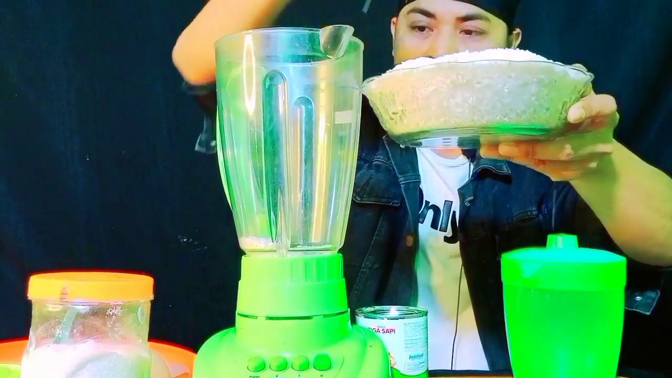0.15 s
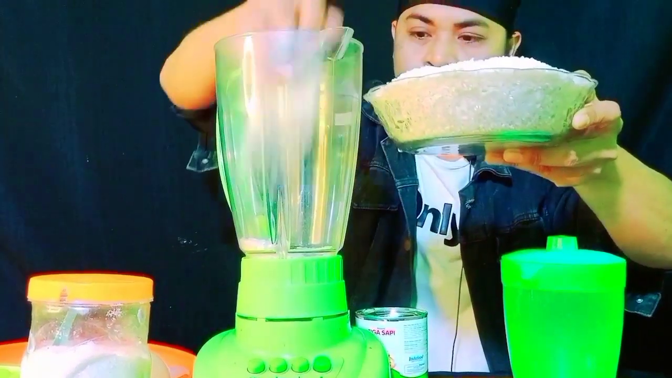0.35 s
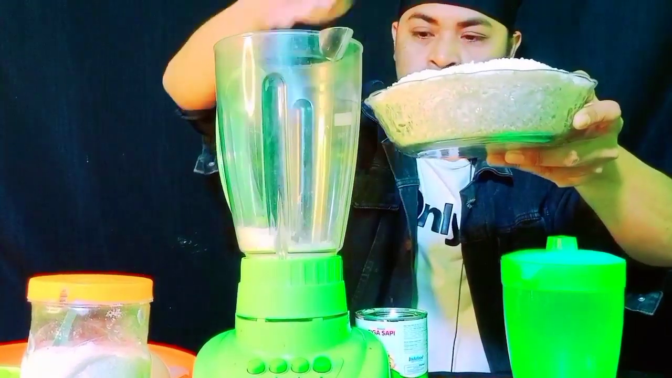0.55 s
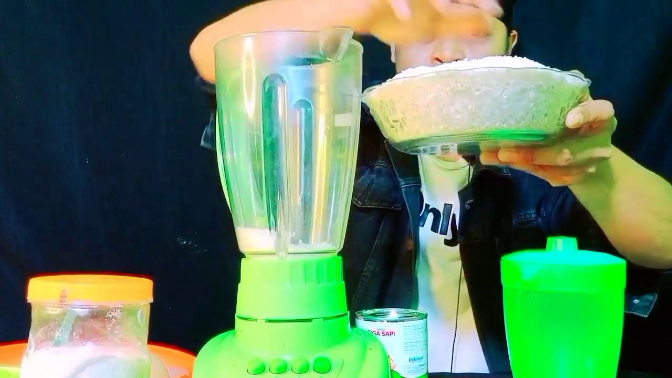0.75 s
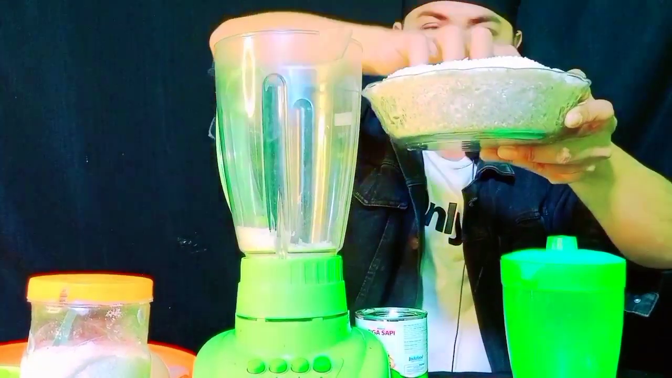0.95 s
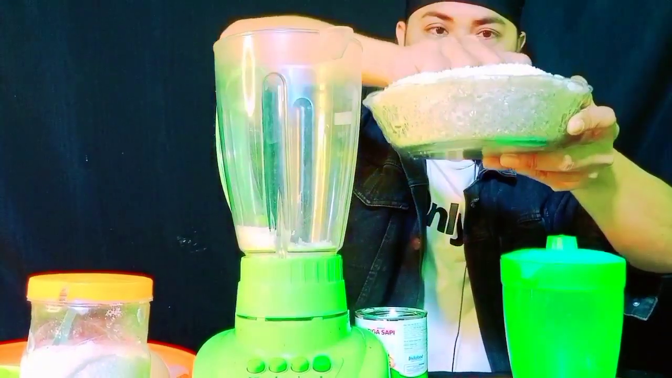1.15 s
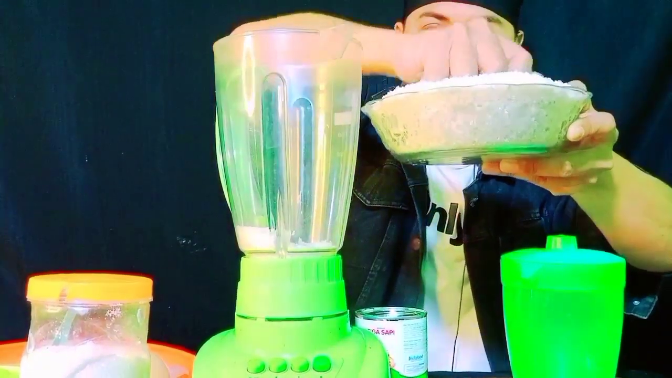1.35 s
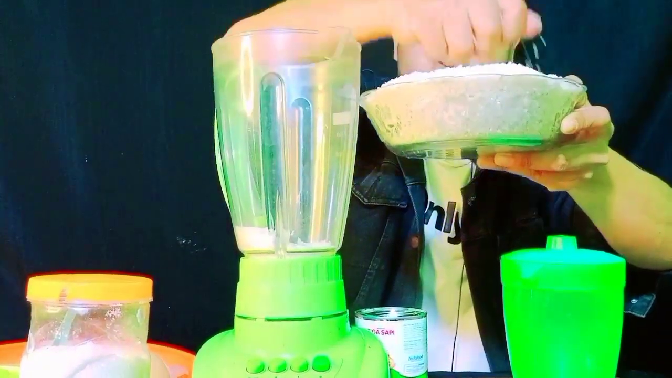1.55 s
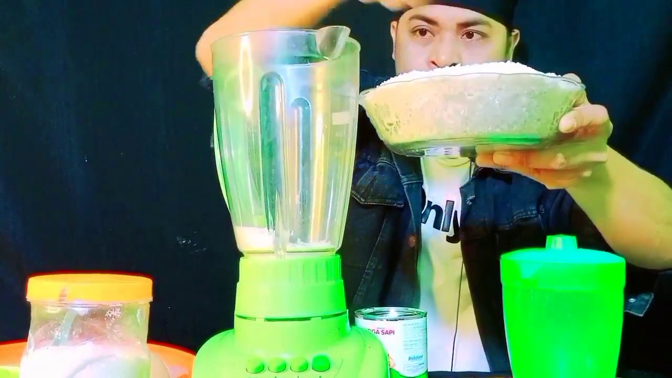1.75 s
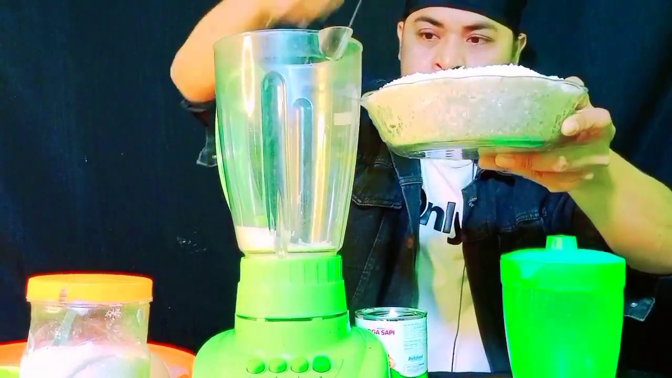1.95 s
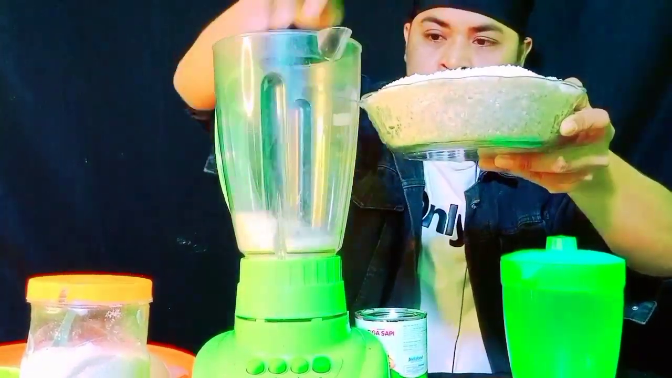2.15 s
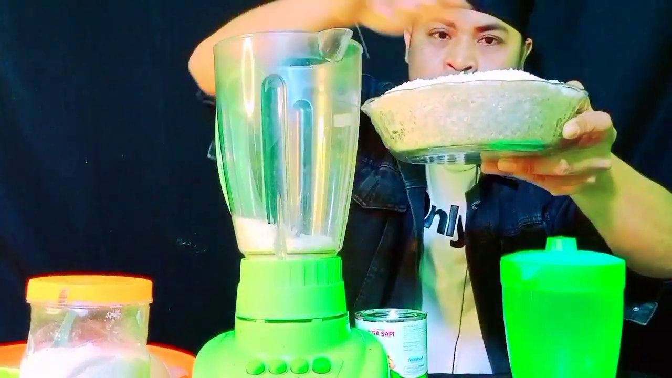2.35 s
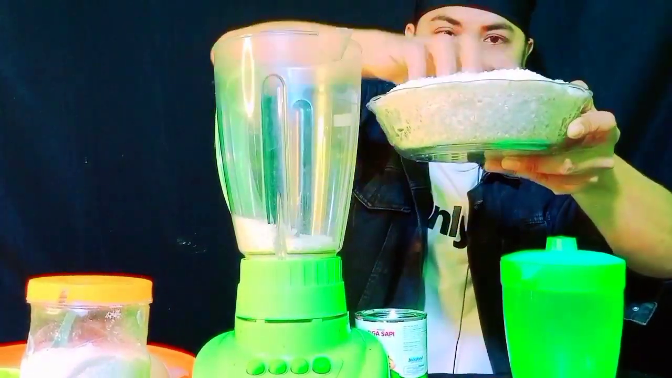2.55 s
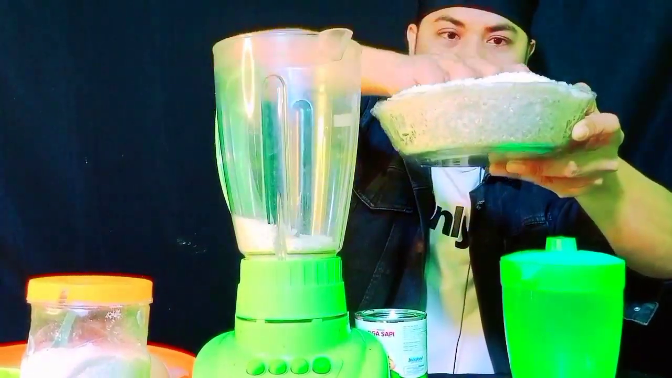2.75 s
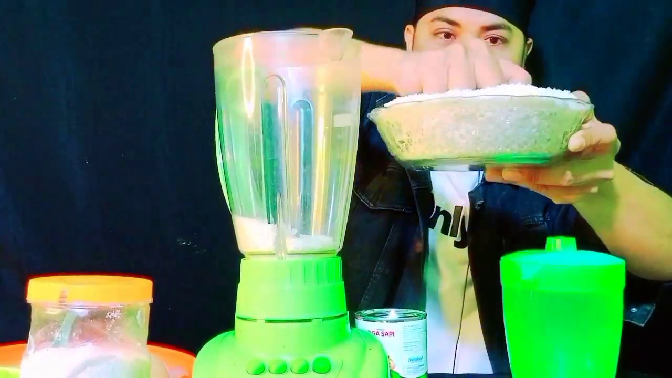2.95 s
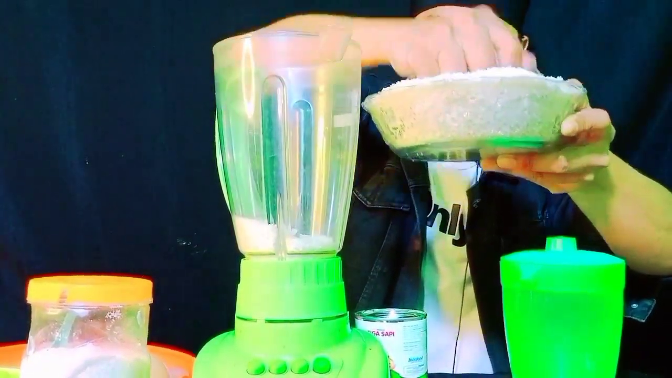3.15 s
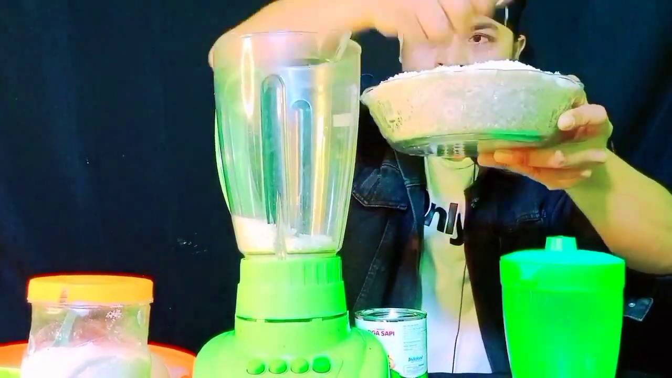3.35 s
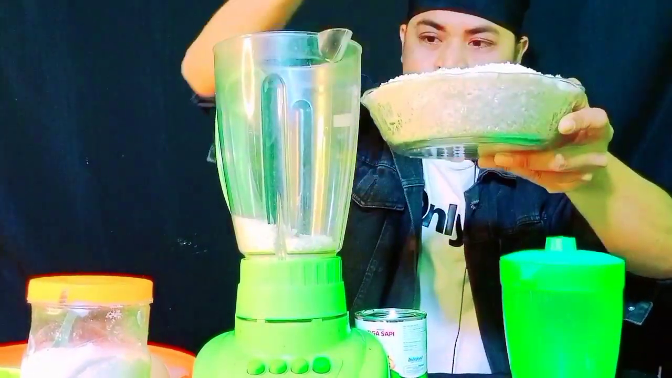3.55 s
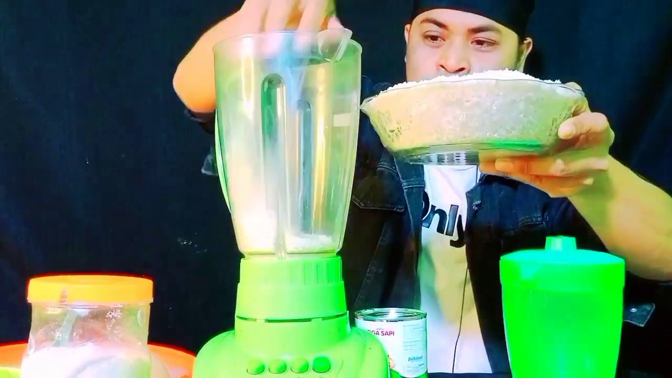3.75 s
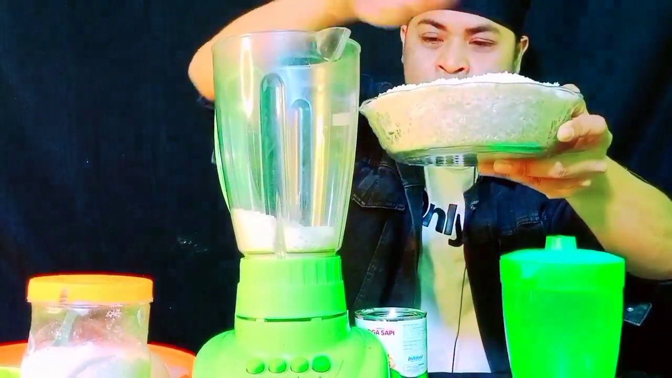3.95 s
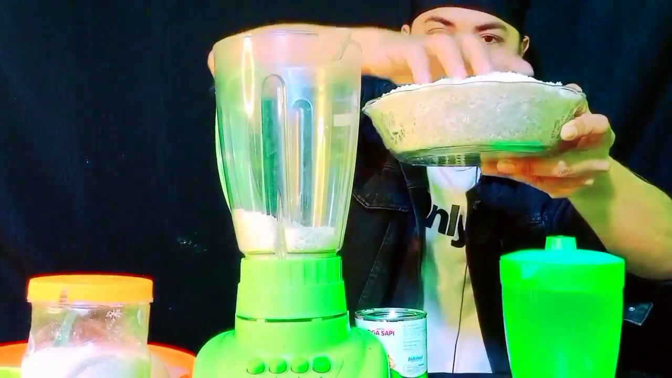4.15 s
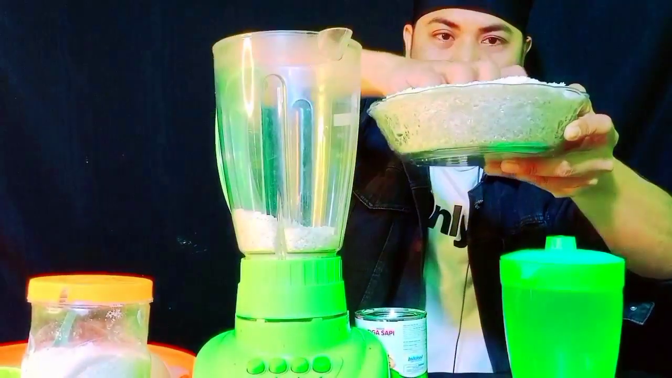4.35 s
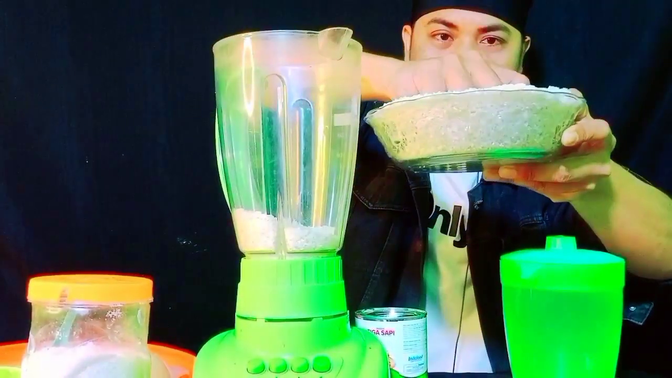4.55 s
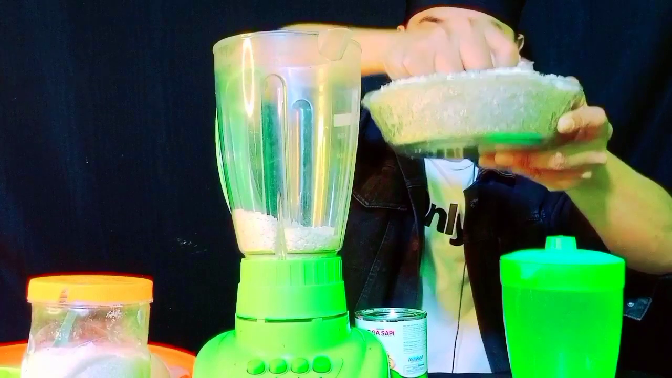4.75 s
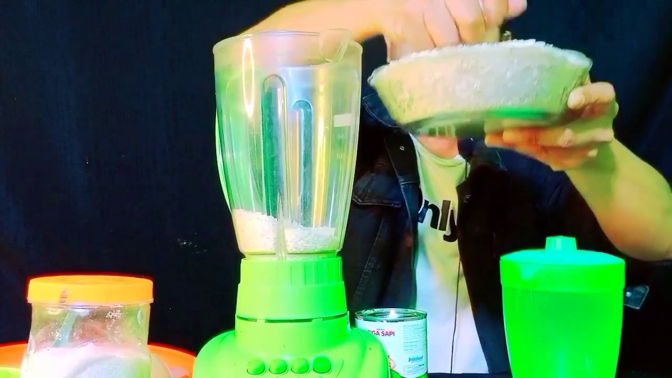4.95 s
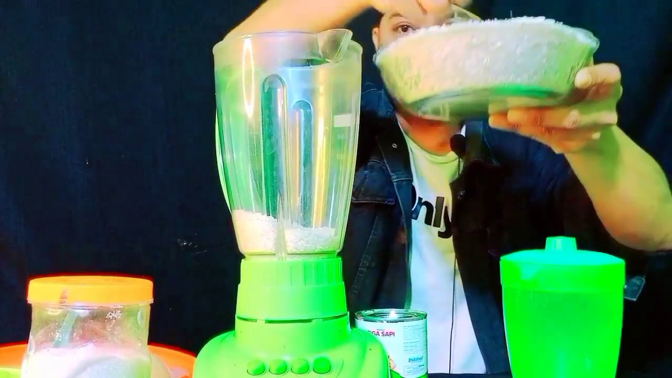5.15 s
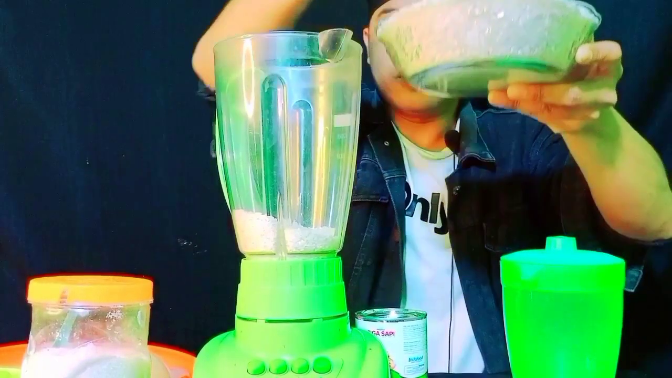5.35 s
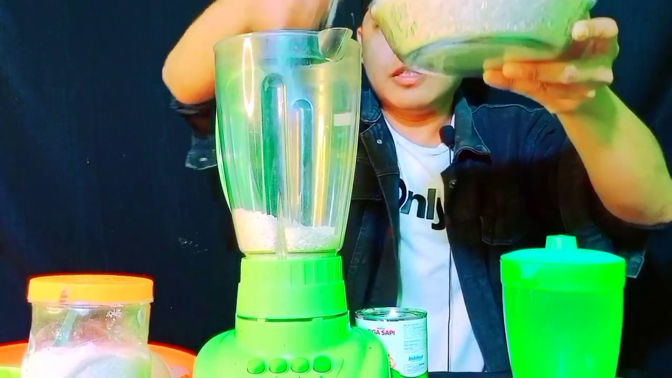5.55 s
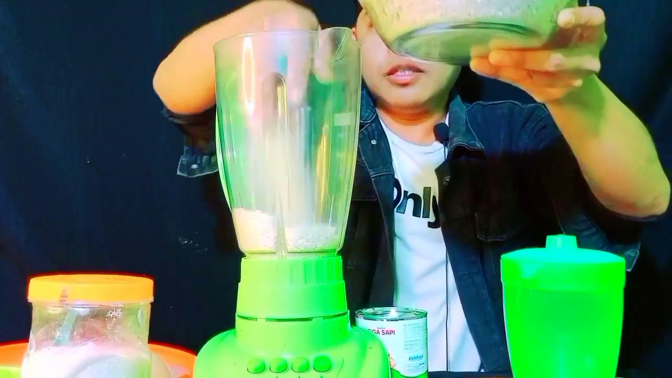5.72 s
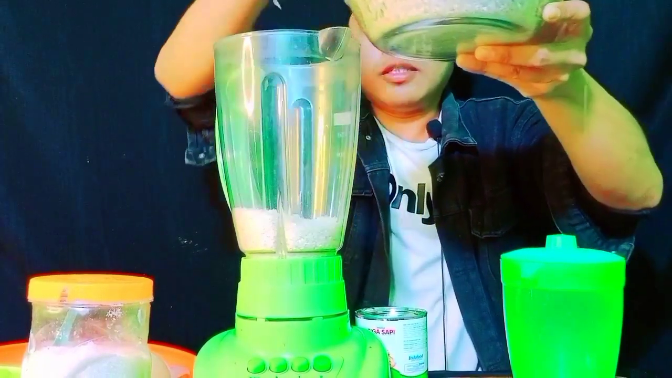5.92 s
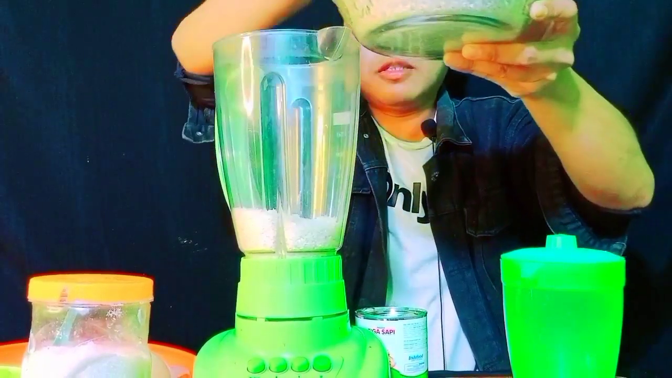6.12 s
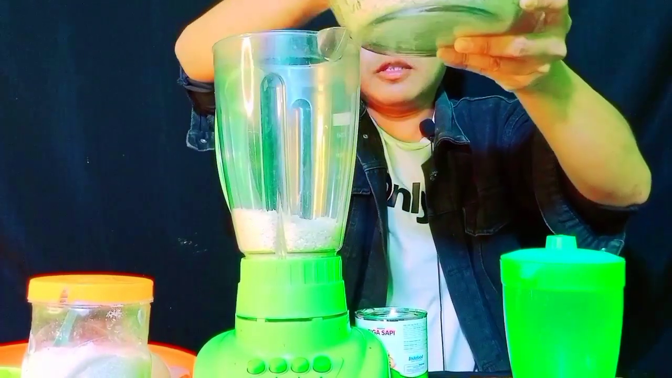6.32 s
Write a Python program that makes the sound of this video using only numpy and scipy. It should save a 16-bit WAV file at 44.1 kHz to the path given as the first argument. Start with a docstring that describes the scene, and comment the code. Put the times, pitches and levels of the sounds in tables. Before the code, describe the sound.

Raw rice rattles into a plastic blender jar right at the start, with a hollow knock, and another handful follows at about 0.3 seconds as a short, bright hiss of tiny impacts. Stray grains tick on the wall. Around 1 second a hand crunches faintly in a bowl of rice, and at 1.5 the jar is bumped, clacking and ringing hollowly. A louder handful lands at 2 seconds, followed by a knock. Soft scooping returns from 2.5 to 3, then a light bump. Another handful falls at 3.7, with the strongest clack at 3.8. Faint scooping runs from 4.2 to 4.8. A softer handful lands at 5.7, trailing into a thin trickle, with two knocks at 6 and 6.2 and a few dry clicks. Everything is close to the microphone, in a room with a short echo and a faint low rumble.

```python
"""Indoors at a table, microphone close to a plastic blender jar, in a room that rings for half a second.
A hand crunches into a bowl of raw rice and drops it into the jar, one handful after another.
Each handful is a shower of tiny impacts, and stray grains tick on the wall. Now and then the arm
bumps the jar, which clacks on its base and rings hollowly. Steady room tone lies underneath."""
import sys
import numpy as np
from scipy import signal
from scipy.fft import rfft, irfft, next_fast_len
from scipy.io import wavfile
from scipy.ndimage import map_coordinates

SR = 44100
rng = np.random.default_rng(int(sys.argv[2]) if len(sys.argv) > 2 else 0)


def pcm_store(signal):
    """Save signal as 16-bit PCM."""
    levels = np.round(np.clip(np.atleast_2d(signal), -1, 1) * 32767)
    wavfile.write(sys.argv[1], SR, levels.astype(np.int16).T)


N = 285889

# The room's reverberation. Each row: frequency in Hz, t60 in seconds.
ROOM_DECAY = [(150, 0.99), (600, 0.39), (2000, 0.49), (5000, 0.47), (9000, 0.42), (15000, 0.26)]
# Tone colours. Each row: frequency in Hz, relative spectral density in dB.
ROOM_TONE_SPECTRUM = [(15, -63.5), (28, -34), (48, -19.5), (62, -7.5), (85, -3.5), (112, -11), (165, -6),
                      (260, -13), (420, -16), (1900, -24), (3200, -28), (6200, -49), (8900, -42.5),
                      (11500, -50), (15400, -42)]  # the steady background
CRUNCH_SPECTRUM = [(300, -24), (620, -8), (900, 4), (1200, -2.5), (1500, -5), (1950, -4.5), (2500, -7),
                   (3300, -16), (4500, -26.5), (6500, -38), (8900, -19), (11000, -39), (15400, -18)]  # grains rubbing in the bowl
SQUEEZE_SPECTRUM = [(400, -25), (750, -23), (950, 1.5), (1400, -12.5), (1950, 7.5), (2400, -6), (3200, -8),
                    (4500, -27), (15000, -37)]  # the fist closing on the grains
CLICK_SPECTRUM = [(600, -34), (1300, -2.5), (1800, 4.5), (2150, -4), (2600, 6), (3100, -10), (3750, 0),
                  (4700, -8.5), (5600, -7.5), (6800, -13), (8000, -3), (9200, -1), (10700, -13.5),
                  (15400, -7.5)]  # a light, dry click
CLACK_SPECTRUM = [(60, -32.5), (170, -20.5), (300, -8), (450, 4), (650, -5.5), (900, -1.5), (1200, -6),
                  (1460, -4), (1750, -7.5), (2100, -4), (2600, -8), (3500, -14), (4400, -28.5), (6500, -37),
                  (15000, -42)]  # the jar striking its seat
THUD_SPECTRUM = [(25, -38.5), (60, -6.5), (110, -15), (175, -2), (240, -3), (350, -5), (600, -18.5),
                 (2000, -53.5)]  # the table under the blender
GRAIN_SPECTRUM = [(40, -48), (120, -18.5), (260, -17), (420, -15), (620, -16), (1000, -11.5), (1400, 0),
                  (2300, 0.5), (3200, -1.5), (4300, -10), (6300, -14.5), (7600, -11), (8900, 0.5),
                  (9900, -11.5), (12500, -12), (14200, -10), (15400, -2)]  # a grain landing in the jar
# Resonances. Each row: frequency in Hz, relative level in dB, free t60 in seconds.
JAR_MODES = [(342, -10, 0.16), (383, -3.5, 0.3), (420.5, -1, 0.47), (480, -15.5, 0.34), (519.5, 0, 0.51),
             (536.6, -5, 0.65), (576, -9.5, 0.14), (761.6, -11, 0.63), (975, -18.5, 0.29),
             (1170, -18.5, 0.79), (1442, -14.5, 0.33), (1980, -20.5, 0.21), (2350, -18.5, 0.19)]  # the whole jar, knocked
WALL_MODES = [(427, -5, 0.16), (559.6, -3, 0.17), (783.8, -0.5, 0.2), (1188, -5.5, 0.19), (1247, 7, .07),
              (1498, 11.5, 0.058), (2206, 1, 0.14), (2469, 5, 0.17), (3030, -4, 0.018), (3610, -5, 0.02)]  # its wall and air column under the light grains
# Lone contacts. Each row: start in seconds, relative level in dB.
STRAY_GRAINS = [(.055, -46), (.074, -31.5), (.163, -39.5), (.236, -43.5), (.269, -37.5), (.313, -33.5),
                (.697, -46), (.726, -54), (.783, -50), (1.975, -54), (5.43, -63.5), (5.474, -57),
                (5.553, -40.5), (5.615, -37.5), (5.871, -47)]  # single grains and small clusters on the wall
DRY_CLICKS = [(1.002, -56), (2.672, -58.5), (2.706, -58), (2.851, -60), (3.019, -62), (3.474, -44.5),
              (6.043, -41.5), (6.08, -40.5), (6.288, -48.5), (6.392, -57), (6.468, -33.5)]  # light clicks of grains and plastic
# The hand in the bowl. Each row: fingers in, fist shut and closing time in seconds, relative grip in dB.
BOWL_SCOOPS = [(0.838, 1.359, 0.078, -54), (2.549, 3.014, 0.045, -53.5), (4.17, 4.786, 0.031, -52)]
# The arm bumping the jar. Each row: start in seconds, then ring, clack, low-mode boost and thud
# in relative dB, then seconds until the jar drops back.
JAR_BUMPS = [(-.04, -30.5, -26, 5, -46, .04), (1.477, -28, -26.5, -4, -47, .03),
             (2.004, -32, -35.5, 1.5, -50.5, .03), (2.152, -23, -25.5, -3, -45.5, .045),
             (3.225, -32.5, -32, -0.5, -56.5, .057), (3.527, -41, -42, -2, -53.5, .047),
             (3.822, -17.5, -16.5, -3, -37, .03), (6.029, -23, -27.5, -20, -48, .059),
             (6.223, -26, -26.5, -1.5, -36, .04)]
# Rice slipping from the fingers. Each row: start and length in seconds, relative flow in dB.
FINGER_TRICKLES = [(0.07, 0.27, -54.5), (0.602, 0.33, -54), (5.555, 0.24, -40.5), (6.076, 0.37, -51.5)]
# Rice dropped into the jar. Each row: start, opening time and time at full flow in seconds,
# relative flow in dB, hardness (treble of hits on the bare wall) in dB.
DROPPED_HANDFULS = [(-.2, 0.097, 0.037, -24.5, 2.5), (.27, 0.14, .02, -23.5, 0),
                    (2.003, 0.099, 0.0097, -19, -3), (3.688, 0.049, 0.047, -21, -1.76),
                    (5.654, 0.069, .035, -27, -3.5)]


def amp(db):
    """Decibels to gain."""
    return 10 ** (np.asarray(db) / 20)


def unit(x):
    """Scale to rms 1."""
    return x / np.sqrt(np.mean(x ** 2) + 1e-20)


def along(points, hz):
    """Read (Hz, value) points on a log frequency axis."""
    freqs, values = np.transpose(points)
    return np.interp(np.log(hz + 1), np.log(freqs + 1), values)


def add(track, s, sound):
    """Mix a sound into the track at s seconds; it may begin before time 0."""
    start = round(s * SR)
    sound = sound[max(0, -start):]
    part = track[max(0, start):][:len(sound)]
    part += sound[:len(part)]


def coloured(x, spectrum, size=4096):
    """Pass x through a causal body of this spectrum, with energy 1."""
    gain = amp(along(spectrum, np.fft.rfftfreq(size, 1 / SR)))
    cepstrum = irfft(np.log(gain))
    cepstrum[1:size // 2] *= 2  # fold to minimum phase
    cepstrum[size // 2 + 1:] = 0
    response = irfft(np.exp(rfft(cepstrum)))
    return signal.fftconvolve(x, response / np.linalg.norm(response))[:N]


def wobble(size, rate):
    """A smooth random curve, rate knots a second."""
    knots = rng.standard_normal(int(size * rate / SR) + 4)
    return map_coordinates(knots, [np.arange(size) * rate / SR])


def impacts(rate, scatter_db):
    """Random impulses of uneven size, rate a second, with mean power 1."""
    chance = np.clip(rate / SR, 1e-6, 1)
    sizes = unit(amp(scatter_db * np.clip(rng.standard_normal(N), -2, 2)))
    signs = rng.choice([-1, 1], N)
    return (rng.random(N) < chance) * sizes * signs / np.sqrt(chance)


def burst(t, rise_s, t60):
    """Noise that swells and dies quickly: one chattering contact."""
    return rng.standard_normal(len(t)) * (1 - np.exp(-t / rise_s)) * amp(-60 * t / t60)


def room_tone(level_db=-63):
    """The background at the microphone: a steady low rumble with faint hiss."""
    return amp(level_db) * unit(coloured(rng.standard_normal(N), ROOM_TONE_SPECTRUM))


def reverberation(x, build_s=0.013, tail_count=22):
    """The room's diffuse tail, treble dying first; it varies slowly so it stays smooth."""
    wet, position = np.zeros(N), np.linspace(0, tail_count - 1, N)
    for k in range(tail_count):
        hz, t, noise = signal.stft(rng.standard_normal(SR * 3 // 4), SR, nperseg=256)
        build = np.clip(t / build_s, 0, 1) ** 2
        decay = amp(-60 * t / along(ROOM_DECAY, hz)[:, None])
        tail = signal.istft(noise * build * decay, SR, nperseg=256)[1]
        near = np.flatnonzero(abs(position - k) < 1)
        crossfade = np.cos(np.pi / 2 * (position[near] - k))
        add(wet, near[0] / SR, signal.fftconvolve(x[near] * crossfade, tail / np.linalg.norm(tail)))
    return wet


def scooping(dig_db=-64, entry_s=0.057, lift_s=0.06, release_s=0.021):
    """Grains rub under the fingers: a muffled crunch with stray ticks, a scrape as the fist closes."""
    t = np.arange(N) / SR
    dig, grip = np.zeros(N), np.zeros(N)
    for enter_s, shut_s, closing_s, grip_db in BOWL_SCOOPS:
        before, after = np.maximum(shut_s - t, 0), np.maximum(t - shut_s, 0)
        dig += amp(dig_db) * np.clip((t - enter_s) / entry_s, 0, 1) * np.exp(-after / lift_s)
        grip += amp(grip_db) * np.exp(-(before / closing_s) ** 2 - after / release_s)
    crunch = np.maximum(dig, grip) * coloured(impacts(rate=2000, scatter_db=1.5), CRUNCH_SPECTRUM)
    scrape = grip * coloured(impacts(rate=1900, scatter_db=4.5), SQUEEZE_SPECTRUM)
    ticking = dig * coloured(impacts(rate=25, scatter_db=2), CLICK_SPECTRUM)
    return amp(-3) * (crunch + scrape) + amp(-16) * ticking


def ticks(rows, spectrum, t60):
    """Lone contacts of grain or plastic, each with a brief chatter."""
    track, t = np.zeros(N), np.arange(SR // 20) / SR
    for s, db in rows:
        add(track, s, amp(db + 7.5) * burst(t, rise_s=0.00069, t60=t60))
    return coloured(track, spectrum)


def housing_hum(bump_s=2.152, db=-15, hz=265, rise_s=0.12, t60=0.54):
    """The heavy motor housing takes up one bump slowly and hums."""
    t = np.maximum(np.arange(N) / SR - bump_s, 0)
    swell = (1 - np.exp(-t / rise_s)) ** 2
    return swell * amp(db - 60 * t / t60) * np.sin(2 * np.pi * hz * t)


def jar_ring(t, low_db, arm_damping=1.193, scatter_db=1.73, waver_cycles=0.2, waver_rise_s=0.043):
    """The knocked jar rings, damped by the arm; the ring soon wavers and roughens."""
    ring = np.zeros(len(t))
    waver = waver_cycles * (1 - np.exp(-t / waver_rise_s))
    for k, (hz, db, t60) in enumerate(JAR_MODES):
        level = db + scatter_db * rng.standard_normal() + low_db * (hz < 450)
        cycles = hz * t + waver * wobble(len(t), rate=45)
        # neighbouring modes start in opposite directions, so the ring swells and beats
        ring += (-1) ** k * amp(level - 60 * arm_damping * t / t60) * np.sin(2 * np.pi * cycles)
    return ring * (1 - np.exp(-t / 0.00074))


def jar_knocks(contact_s=0.0053, soft_hz=2700, rattle_delay_s=0.02, rattle_db=-7):
    """The jar clacks on its seat, rattles and rings, then drops back more softly; the table thuds."""
    clacks, thuds, ringing = np.zeros(N), np.zeros(N), np.zeros(N)
    t = np.arange(SR * 2 // 3) / SR
    contact = (t / contact_s) ** 2 * np.exp(1 - (t / contact_s) ** 2)
    soft = signal.butter(3, soft_hz, fs=SR, output="sos")  # first contact is duller than the rattle
    for s, ring_db, clack_db, low_db, thud_db, drop_s in JAR_BUMPS:
        bump = (s, ring_db, clack_db)
        drop_back = (s + drop_s, ring_db - 14.5, clack_db - 6.5)
        for at, ring, clack in (bump, drop_back):
            add(clacks, at, amp(clack) * contact * signal.sosfilt(soft, rng.standard_normal(len(t))))
            add(clacks, at + rattle_delay_s, amp(clack + rattle_db) * burst(t, rise_s=0.012, t60=0.15))
            add(ringing, at, amp(ring) * jar_ring(t, low_db))
        add(thuds, s, amp(thud_db) * burst(t, rise_s=0.0074, t60=0.21))
    blows = coloured(clacks, CLACK_SPECTRUM) + coloured(thuds, THUD_SPECTRUM)
    return blows, ringing


def rice_flow(emptying_db_per_s=161.5, cushion_db_per_s=29, trickle_fade_db=10.5, trickle_hard_db=-1):
    """Flow and hardness of the falling rice: handfuls swell, hold and die away; trickles fade."""
    t = np.arange(N) / SR
    flow, treble = np.zeros(N), np.zeros(N)
    for s, opening_s, hold_s, db, hard_db in DROPPED_HANDFULS:
        opening = np.sin(np.pi / 2 * np.clip((t - s) / opening_s, 0, 1)) ** 2
        late = np.maximum(t - s - opening_s - hold_s, 0)
        stream = opening * amp(db - emptying_db_per_s * late)
        flow += stream
        treble += stream * amp(hard_db - cushion_db_per_s * late)  # late grains land on earlier ones
    for s, length_s, db in FINGER_TRICKLES:
        age = (t - s) / length_s
        stream = (age > 0) * (age < 1) * amp(db - trickle_fade_db * np.clip(age, 0, 1))
        flow += stream
        treble += stream * amp(trickle_hard_db)
    return flow, treble / (flow + 1e-20)


def falling_rice(sparse_rate=110, dense_rate=6000, hollow_db=-10, fill_db_per_s=1):
    """Grains shower into the jar: more flow, more and stronger hits, brighter on wall than on heap."""
    flow, hardness = rice_flow()
    hits_per_s = sparse_rate + dense_rate * (flow / amp(-21)) ** 0.75
    hits = flow * impacts(hits_per_s, scatter_db=3.5)
    shower = coloured(hits, GRAIN_SPECTRUM)
    dull = signal.sosfiltfilt(signal.butter(2, 4500, fs=SR, output="sos"), shower)
    t = np.arange(SR // 3) / SR
    wall = sum(amp(db - 60 * t / t60) * np.sin(2 * np.pi * hz * t) for hz, db, t60 in WALL_MODES)
    low_cut = signal.butter(3, 350, "high", fs=SR, output="sos")  # the wall's ring carries no bass
    wall = signal.sosfilt(low_cut, wall)
    hollow = signal.fftconvolve(hits, wall / np.linalg.norm(wall))[:N]
    hollow *= amp(hollow_db - fill_db_per_s * np.arange(N) / SR)  # the growing heap mutes the jar
    return dull + hardness * (shower - dull) + hollow


def scene():
    """Rice, jar and bowl close to one microphone, with the room behind them."""
    blows, ringing = jar_knocks()
    ringing += housing_hum()
    rice = falling_rice() + ticks(STRAY_GRAINS, GRAIN_SPECTRUM, t60=0.048)
    clicks = ticks(DRY_CLICKS, CLICK_SPECTRUM, t60=0.04)
    contacts = rice + clicks + blows + scooping()
    direct = amp(0.5) * contacts + amp(-2) * ringing
    reflected = reverberation(amp(-2) * contacts + amp(-9.5) * ringing)
    return (direct + reflected + room_tone())[None]


def record(dry, top_hz=15780):
    """The recorder keeps nothing above its band limit."""
    size = next_fast_len(N + SR // 2)
    gain = 1 / (1 + (np.fft.rfftfreq(size, 1 / SR) / top_hz) ** 220)
    return irfft(rfft(dry, size) * gain, size)[:, :N]


dry = scene()
out = record(dry)
pcm_store(out)
```